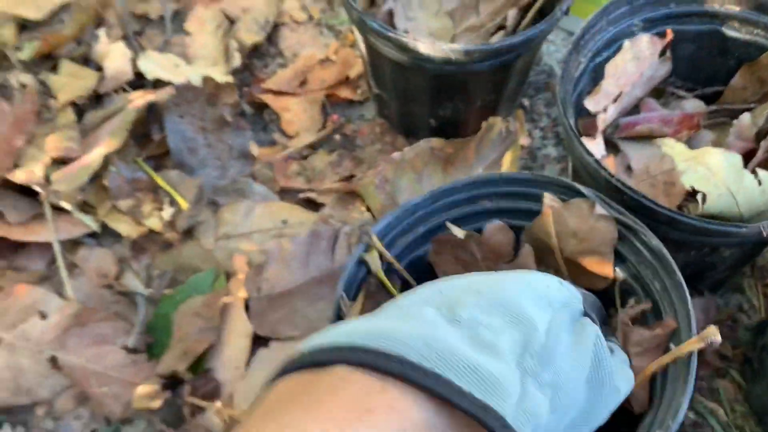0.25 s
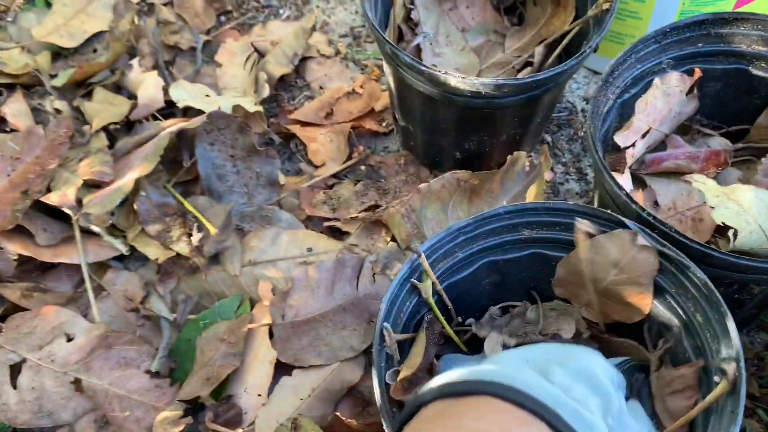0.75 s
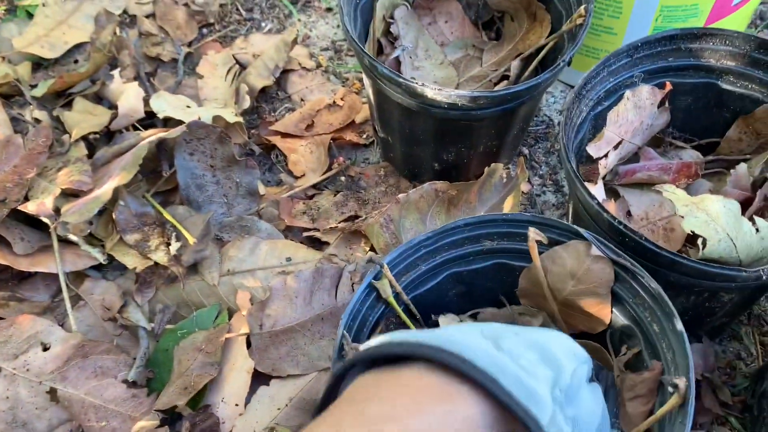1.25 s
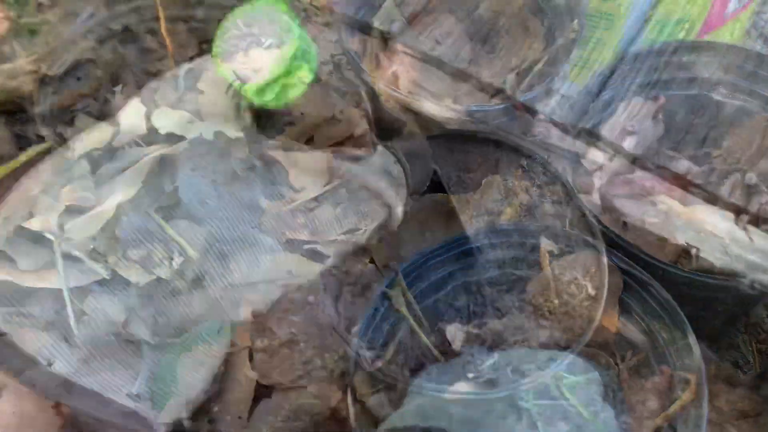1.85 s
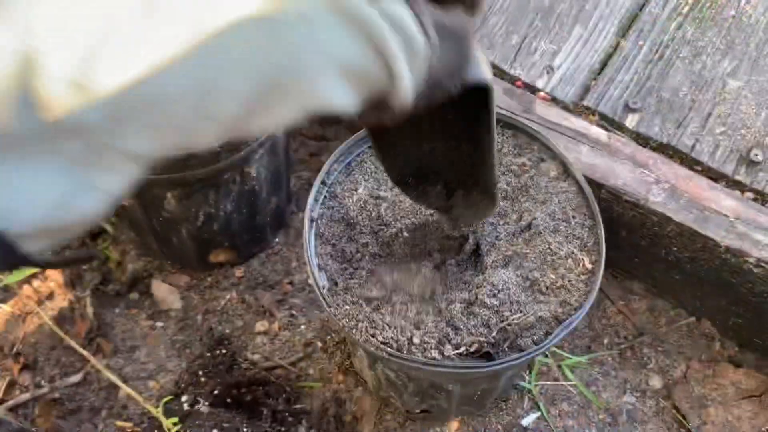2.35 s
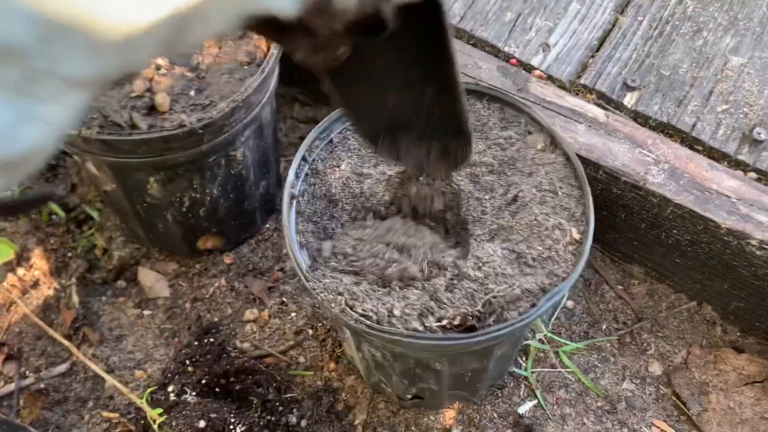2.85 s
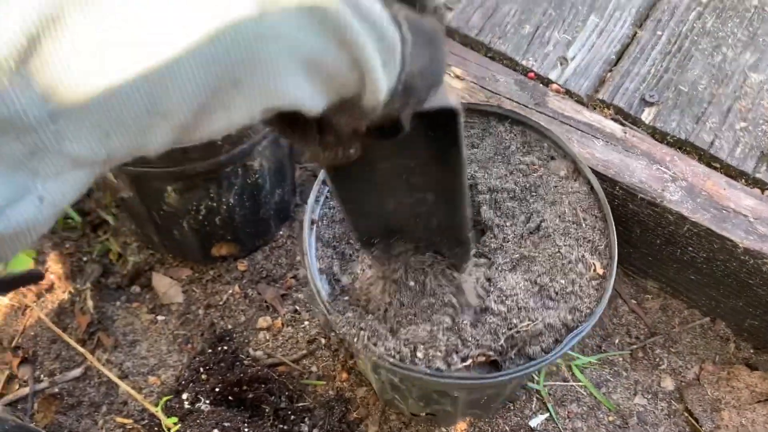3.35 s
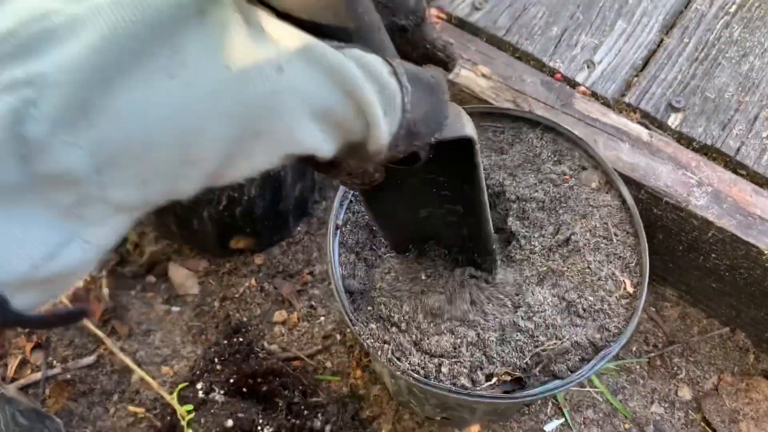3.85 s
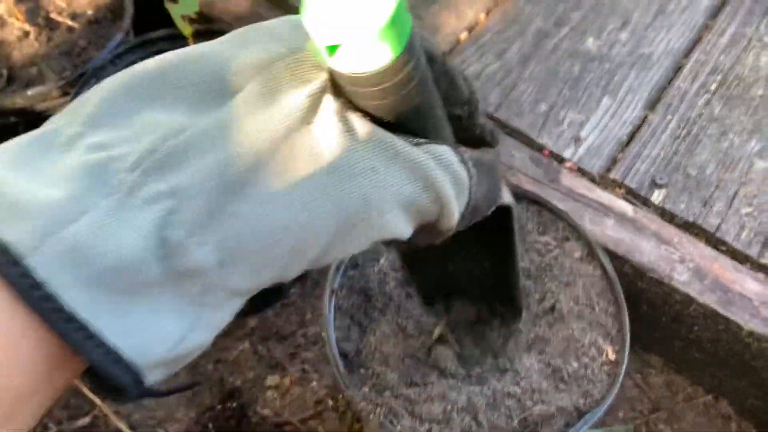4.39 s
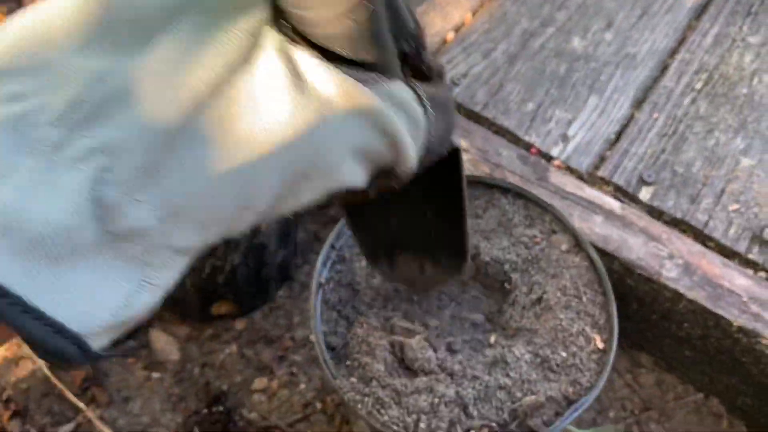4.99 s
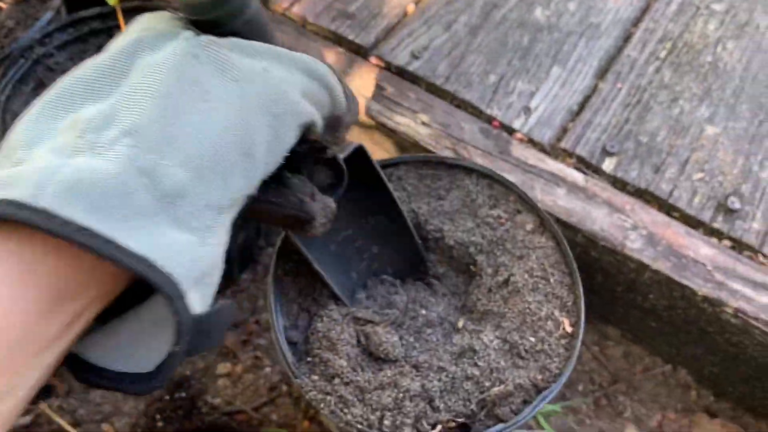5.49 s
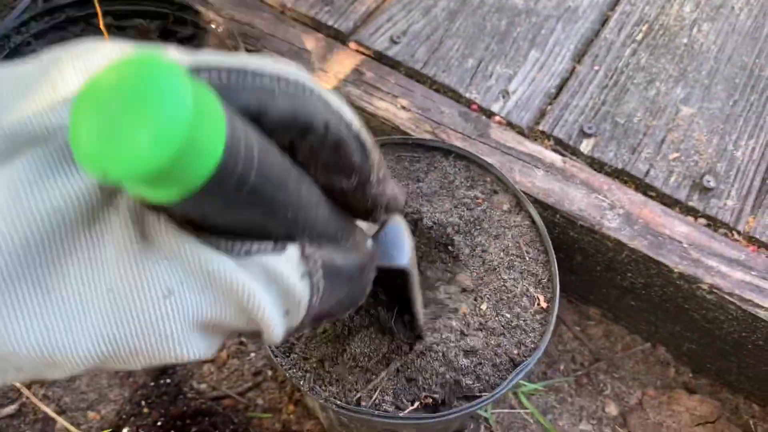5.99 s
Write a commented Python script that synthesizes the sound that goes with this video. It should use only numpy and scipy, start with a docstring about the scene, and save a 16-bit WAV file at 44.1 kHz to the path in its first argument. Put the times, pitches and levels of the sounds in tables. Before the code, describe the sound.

Dry leaves crush and crack near the microphone as a hand pushes them into a plastic plant pot. A low machine hum fades away with them, and a trowel starts digging in another pot, with quieter scrapes, a bright hiss of grit and small sharp clicks. Behind this outdoor gardening are a low rumble of far traffic, a few faint bird whistles and, late on, a run of raspy chirps.

```python
"""Gardening outdoors, close up, over a rumble of far traffic. For the first two seconds a gloved hand presses
dry leaves into a plastic pot: they crush, their ribs snap and the pot rings hollow. A far bird starts to
whistle, and a machine's hum fades out with the leaves. From about 2.3 s a trowel stabs and stirs gritty soil in
another pot: grit hisses and ticks along the blade, and the blade knocks against the pot and soil and rings.
From about 4.3 s a second bird repeats a raspy chirp behind the last strokes."""
import sys
import numpy as np
from scipy import signal
from scipy.fft import rfft, irfft, next_fast_len
from scipy.io import wavfile
from scipy.ndimage import uniform_filter1d, map_coordinates

SR = 44100
rng = np.random.default_rng(int(sys.argv[2]) if len(sys.argv) > 2 else 0)


def persist_wave(psi):
    """Save psi, clipped to +-1, as 16-bit WAV."""
    counts = np.round(np.clip(psi, -1, 1) * 32767).astype(np.int16)
    wavfile.write(sys.argv[1], SR, np.atleast_2d(counts).T)


N = 274743
TIME = np.arange(N) / SR


def amp(db):
    """Decibels to gain."""
    return 10 ** (np.asarray(db) / 20)


def unit(x):
    """Scale to rms 1."""
    return x / np.sqrt(np.mean(x ** 2) + 1e-20)


def along(points, hz):
    """Read (Hz, value) points on a log frequency axis."""
    point_hz, values = np.transpose(points)
    return np.interp(np.log(hz + 1), np.log(point_hz + 1), values)


def wobble(rate):
    """A smooth random curve with `rate` knots a second."""
    knots = rng.standard_normal(int(N * rate / SR) + 4)
    return map_coordinates(knots, [TIME * rate])


def swell(peak_s, rise, fall, power, ease_s=0.01):
    """A gesture builds to its peak and eases off; the hand cannot start or stop faster than ease_s."""
    ramp = np.interp(TIME, [peak_s - rise, peak_s, peak_s + fall], [0, 1, 0]) ** power
    return uniform_filter1d(ramp, int(ease_s * SR))


def filtered(x, response):
    """Pass x through a complex frequency response."""
    size = next_fast_len(N + SR // 2)
    return irfft(rfft(x, size) * response(np.fft.rfftfreq(size, 1 / SR)), size)[..., :N]


def colour(spectrum):
    """A minimum-phase EQ of unit power that follows (Hz, dB) points."""
    def response(hz):
        cepstrum = irfft(np.log(unit(amp(along(spectrum, hz)))))
        half = len(cepstrum) // 2
        cepstrum[1:half] *= 2
        cepstrum[half + 1:] = 0
        return np.exp(rfft(cepstrum))
    return response


def resonances(modes):
    """A resonator bank of unit power, built from (Hz, width Hz, dB) modes."""
    return lambda hz: unit(sum(amp(db) * 1j * hz * width / (centre ** 2 - hz ** 2 + 1j * hz * width)
                               for centre, width, db in modes))


def noise(spectrum):
    """Two unrelated streams of noise in one colour."""
    return unit(filtered(rng.standard_normal((2, N)), colour(spectrum)))


def grains(rate, spread_db, life_s, bed):
    """Tiny fractures, each with its own pitch and size, over a bed of finer friction; white overall."""
    t = np.arange(128) / SR
    when, pitch, chance, phase = rng.random((int(rate * N / SR), 4)).T
    size = amp(-spread_db * np.log(.02 + chance))  # many small, a few large
    tones = np.sin(np.pi * (SR * pitch[:, None] * t + 2 * phase[:, None]))
    pings = size[:, None] * np.exp(-t / life_s) * tones
    at = (when * N).astype(int)[:, None] + np.arange(len(t))
    fractures = np.bincount(at.ravel(), pings.ravel(), N)[:N]
    return unit(unit(fractures) + bed * rng.standard_normal(N))


def crackle(spectrum, rate, spread_db, life_s, bed):
    """Two unrelated streams of grains in one colour, each with `rate` grains a second."""
    pair = np.array([grains(rate, spread_db, life_s, bed) for _ in range(2)])
    return unit(filtered(pair, colour(spectrum)))


def cracks(table, rise_s, decay_s, tail_db, tail_s):
    """Sharp noise bursts with weak crumbling tails: one pair of signals for each dB column."""
    t = np.arange(SR // 30) / SR
    drives = np.zeros((len(table[0]) - 1, 2, N + len(t)))
    attack = (1 - np.exp(-t / rise_s)) ** 2
    envelope = attack * (np.exp(-t / decay_s) + amp(tail_db) * np.exp(-t / tail_s))
    for start_s, *band_db in table:
        burst = rng.standard_normal((2, len(t))) * envelope
        burst *= np.sqrt(SR / 1000) / np.linalg.norm(burst, axis=1, keepdims=True)  # as 1 ms at rms 1
        at = round(start_s * SR)
        drives[..., at:at + len(t)] += amp(band_db)[:, None, None] * burst
    return drives[..., :N]


# Stereo balance, leaning slightly right. Each row: frequency in Hz, left minus right in dB.
BALANCE = [(60, -2.5), (300, -2.1), (1200, 0.5), (2400, -1.5), (3400, -2), (5000, -3.5), (7000, 0),
           (15000, 0)]


def stereo(pair, likeness, phase=None):
    """Two unrelated signals reach two microphone ports partly alike; a phase table lets one side lead."""
    def blend(hz):
        angle = np.arccos(np.clip(along(likeness, hz), 0, 1)) / 2
        return np.array([np.cos(angle), np.sin(angle)])

    def pan(hz):
        lead = along(phase, hz) if phase else 0
        left = amp(along(BALANCE, hz) / 2) * np.exp(.5j * lead)
        return np.array([left, 1 / left])
    mid, side = filtered(pair, blend)
    return filtered(np.array([mid + side, mid - side]), pan)


# The yard's reverb, longest in the lows. Each row: frequency in Hz, seconds to fall by 60 dB.
YARD_DECAY = [(200, 1), (3000, 0.16), (12000, 0.058)]


def yard_echoes(x):
    """Scattered echoes from fences and trees, different on each side."""
    hz, t, bands = signal.stft(rng.standard_normal((2, SR // 2)), SR, nperseg=256)
    decay = amp(-60 * t / along(YARD_DECAY, hz)[:, None])
    tail = signal.istft(bands * decay, SR, nperseg=256)[1]
    return signal.fftconvolve(x, tail / np.linalg.norm(tail[0]), axes=1)[:, :N]


# The traffic's fader ride. Each row: time in seconds, level in dB.
TRAFFIC_RIDE = [(0, -44.5), (1.1, -46), (2.1, -49.5), (6.2, -48.5)]
# Its deep tone. Each row: frequency in Hz, relative level in dB.
TRAFFIC_EQ = [(13, -59.5), (22, -26.5), (27, -21), (34, -26), (46, -3), (81, 0.5), (135, -4.5), (161, -13),
              (231, -12.5), (280, -20), (331, -20.5), (402, -25.5), (600, -33.5), (780, -49.5),
              (1320, -120)]


def traffic():
    """Far traffic: a low, gently wavering rumble, loudest at the start."""
    level_db = np.interp(TIME, *np.transpose(TRAFFIC_RIDE))
    return amp(level_db + .6 * wobble(7)) * noise(TRAFFIC_EQ)


def machine_hum(pitch_hz=59.2):
    """A machine hums on one slightly unsteady low note, then fades out."""
    fade = np.interp(TIME, [1.6, 2.15], [1, 0])
    gain = amp(-47 + 1.5 * wobble(6.7)) * fade
    return gain * np.sqrt(2) * np.sin(2 * np.pi * pitch_hz * TIME + .2 * wobble(4.7))


# The soft wash of open air. Each row: frequency in Hz, relative level in dB.
AIR_EQ = [(150, -19.5), (400, 6.5), (600, 1.5), (1000, 5), (1500, -3.5), (2400, -8), (4000, -14),
          (6000, -16.5), (10000, -21), (15500, -37.5)]
# The ambience is narrow in the bass, wide above. Each row: frequency in Hz, left-right likeness (0-1).
AMBIENCE_LIKENESS = [(60, 1), (140, 0.81), (300, 0.53), (600, 0.056), (3000, 0.067)]


def ambience():
    """The outdoor bed: hum in the middle, traffic and faint air around it."""
    hum = machine_hum() * np.array([[1], [0]])  # feeds the mid only
    rumble = traffic()
    air = amp(-71 + 0.23 * wobble(1.2)) * noise(AIR_EQ)
    return stereo(rumble + air + hum, AMBIENCE_LIKENESS)


def slurs(notes, rasp):
    """Bird notes swell and trail off, gliding ever slower to their last pitch; flutter adds rasp."""
    song = np.zeros(N + SR)
    flutter = wobble(400)
    for start_s, length_s, from_hz, to_hz, db in notes:
        progress = np.linspace(0, 1, int(length_s * SR))
        at = round(start_s * SR) + np.arange(len(progress))
        glide = from_hz * (to_hz / from_hz) ** np.sin(np.pi / 2 * progress)
        pitch = glide * (1 + rasp * flutter[at % N])
        envelope = amp(db) * np.sqrt(2) * np.abs(np.sin(np.pi * progress)) ** .8
        song[at] += envelope * np.sin(2 * np.pi * np.cumsum(pitch) / SR)
    return song[:N]


def chirps(count, start_s, every_s, length_s, from_hz, to_hz, db):
    """A bird repeats one quick, raspy slur at an even pace."""
    notes = [(start_s + k * every_s, length_s, from_hz, to_hz, db) for k in range(count)]
    return slurs(notes, rasp=.09)


# The first bird's slurred whistles. Each row: start in seconds, length in seconds, first pitch in Hz,
# last pitch in Hz, level in dB ahead of the dry/wet mix.
BIRD_WHISTLES = [(1.3, .2, 3250, 3050, -70), (3.275, 0.24, 4020, 3030, -67.5),
                 (3.867, 0.2025, 3350, 3200, -77), (6.13, 0.11, 3900, 4300, -75)]


def birds():
    """Two far birds, blurred by echoes: wavering whistles and, further off, a run of falling chirps."""
    whistles = slurs(BIRD_WHISTLES, rasp=.026) * amp(2 * wobble(45))
    run = chirps(count=12, start_s=4.274, every_s=.1645, length_s=.07, from_hz=3800, to_hz=2360, db=-68.5)
    echoes = yard_echoes(np.array([whistles + run] * 2))
    return amp(-8.5) * whistles + amp(-10) * run + amp(1) * echoes


# The bright sizzle of fine grit. Each row: frequency in Hz, relative level in dB.
GRIT_EQ = [(3000, -30), (5500, -14.5), (7000, -2.5), (8500, 2), (10600, 2), (12200, -2.5), (14000, -5.5),
           (15700, -4)]
# The soil's stereo width. Each row: frequency in Hz, left-right likeness (0-1).
SOIL_LIKENESS = [(500, 0.55), (2000, 0.74), (5200, 0.61), (7200, 0.9), (10500, 0.68), (11700, 1),
                 (13000, 1)]
# The phone's fixed left-right phase, as heard on the trowel and grit.
# Each row: frequency in Hz, lead of the left side in radians.
SOIL_LEAD = [(400, 0), (1800, .7), (3400, 2.4), (5000, 2.3), (6000, 3), (7200, 3), (9300, 0),
             (11650, -3.14), (14000, -6.3), (16000, -9.4)]


def crumbs(start_s=1.5, level_db=-82):
    """Loose soil settles in faint, uneven trickles."""
    gain = amp(level_db + 2.2 * wobble(14)) * (TIME > start_s)
    trickle = gain * crackle(GRIT_EQ, rate=900, spread_db=7, life_s=.00016, bed=.8)
    return stereo(trickle, SOIL_LIKENESS, SOIL_LEAD)


def pot_walls(x, echo_db, t60_s):
    """Quick bounces between the pot's walls ripple the spectrum; long waves bend round them."""
    t = np.arange(SR // 25) / SR
    bounces = rng.standard_normal(len(t)) * amp(-60 * t / t60_s) * (t > .001)
    bounces = signal.lfilter(*signal.butter(2, 1500, "high", fs=SR), bounces)
    echoes = signal.fftconvolve(x, bounces[None] / np.linalg.norm(bounces), axes=1)[:, :N]
    return x + amp(echo_db) * echoes


# Snapping ribs and stalks. Each row: start in seconds, body level in dB, treble level in dB.
RIB_SNAPS = [(.097, -58, -44), (.157, -34, -43), (.222, -46, -37.5), (.35, -35, -46), (.442, -30.5, -31),
             (.482, -49, -36), (.503, -29, -32), (.52, -21.5, -23), (.55, -23, -24), (.612, -31, -30.5),
             (.693, -31, -25.5), (.708, -23.5, -26), (.721, -27, -31.5), (.761, -36, -32.5),
             (.77, -50, -46), (.794, -31, -34.5), (.817, -36, -42), (.957, -37, -39), (1.077, -41, -30),
             (1.116, -33, -45), (1.173, -60, -35), (1.219, -61, -36), (1.236, -42, -31.5),
             (1.242, -45.5, -41), (1.337, -63, -63), (1.358, -49, -55), (1.441, -61, -53),
             (1.519, -55.5, -60), (1.595, -46.5, -46), (1.655, -47, -33), (2.053, -53, -44.5)]
# A rib's woody body and a leaf's crisp edges. Each row: frequency in Hz, relative level in dB.
RIB_EQ = [(200, -22.5), (500, -3), (1000, -6.5), (2500, -4.5), (3600, 3.5), (4600, 3), (5600, -16),
          (9000, -34.5)]
CRISP_EQ = [(3000, -30.5), (5800, -9), (7200, 0.5), (9000, -1.5), (11300, -4.5), (12500, -7.5),
            (15600, -12)]


def rib_snaps():
    """Dry ribs and stalks break, each with a woody crack and a crisp top."""
    body, treble = cracks(RIB_SNAPS, rise_s=0.00092, decay_s=.0008, tail_db=-32, tail_s=0.013)
    return filtered(body, colour(RIB_EQ)) + filtered(treble, colour(CRISP_EQ))


# Presses of the glove. Each row: moment of greatest force, rise and fall, all in seconds,
# then crush level in dB, crisp-edge level in dB.
GLOVE_PRESSES = [(.03, 0.4, 0.1, -55, -59.5), (.21, 0.18, .21, -48.5, -55), (0.449, .15, 0.2, -40.5, -45.5),
                 (.625, 0.024, 0.056, -41, -41.5), (.71, 0.21, 0.093, -36, -40.5),
                 (.98, 0.2, 0.24, -49, -55), (1.12, 0.13, 0.09, -42.5, -47.5),
                 (1.21, 0.08, 0.059, -45, -50.5), (1.29, .08, 0.31, -62.5, -76),
                 (1.54, 0.14, 0.16, -57, -62.5), (1.69, 0.13, 0.1, -54.5, -49),
                 (1.91, 0.19, 0.21, -63, -61.5), (2.05, 0.036, 0.21, -69.5, -70)]
# Fingers bumping the inside of the pot. Each row: start in seconds, level in dB.
FINGER_BUMPS = [(.157, -37), (.222, -33), (.35, -33.5), (.794, -34), (1.18, -42), (1.267, -46),
                (1.446, -46.5), (1.519, -44)]
# The midrange crunch of crushed leaves. Each row: frequency in Hz, relative level in dB.
CRUSH_EQ = [(150, -36.5), (330, 0), (430, -2), (520, -1), (700, 4.5), (930, 4), (1220, -1), (1500, 0.5),
            (2300, 2), (2800, -4), (3300, -4.5), (4600, -8.5), (5600, -11), (7000, -10.5), (9000, -27)]
# The plastic pot's hollow ring. Each row: frequency in Hz, bandwidth in Hz, relative level in dB.
POT_MODES = [(416, 29, 4), (852, 110, -9), (980, 43, -1.5), (1358, 110, -9.5), (1480, 120, -9.5),
             (3110, 150, 0), (4100, 53, -10.5), (4530, 720, 1.5)]
# The leaves' stereo width. Each row: frequency in Hz, left-right likeness (0-1).
LEAF_LIKENESS = [(500, 0.73), (1000, 0.95), (2100, 0.94), (2800, 0.29), (4500, 0.2), (5400, 0.13),
                 (7200, 0.98), (10500, 0.61), (11700, 1), (13000, 0.96)]
# The phone's fixed left-right phase, as heard on the leaves.
# Each row: frequency in Hz, lead of the left side in radians.
LEAF_LEAD = [(100, 0), (2400, 0), (3100, 1.3), (3600, .6), (4700, .3), (5600, 4), (7200, 3.1), (9300, 0),
             (11650, -3.14), (14000, -6.3), (16000, -9.4)]


def leaves():
    """Leaves buckle in clumps and splinter under each press; the crush and finger bumps ring the pot."""
    force = np.array([swell(s, rise, fall, power=0.91) for s, rise, fall, *_ in GLOVE_PRESSES])
    press_power = amp(np.array(GLOVE_PRESSES)[:, 3:].T) ** 2
    crush_gain, crisp_gain = np.sqrt(press_power @ force ** 2)
    clumps = wobble(70)
    crush = crackle(CRUSH_EQ, rate=2500, spread_db=5, life_s=0.0013, bed=1)
    crush *= crush_gain * amp(1.2 * clumps)
    crisp = crackle(CRISP_EQ, rate=1200, spread_db=3, life_s=0.00044, bed=0.77)
    crisp *= crisp_gain * amp(1.9 * clumps)
    snaps = rib_snaps()
    splinters = amp(-10) * crush_gain * crackle(RIB_EQ, rate=210, spread_db=1.5, life_s=0.00077, bed=0)
    splinters += amp(-7) * crisp_gain * crackle(CRISP_EQ, rate=140, spread_db=6.5, life_s=0.00047, bed=0)
    bumps, = cracks(FINGER_BUMPS, rise_s=0.0002, decay_s=0.00064, tail_db=-28, tail_s=.004)
    body = crush + filtered(bumps, colour(CRUSH_EQ))
    hollow = amp(-19.5) * filtered(body, resonances(POT_MODES))
    in_pot = pot_walls(body + hollow + crisp, echo_db=-7.5, t60_s=0.042)
    return stereo(in_pot + snaps + splinters, LEAF_LIKENESS, LEAF_LEAD)


# Grit hitting the blade. Each row: start in seconds, click level in dB, treble level in dB.
GRIT_TICKS = [(2.272, -57, -51), (2.305, -43, -38.5), (2.356, -43, -28.5), (2.515, -65, -49),
              (2.612, -55, -48), (2.633, -48, -39), (2.812, -62, -41), (2.916, -50, -29), (3.154, -60, -50),
              (3.415, -78, -64), (3.525, -76, -64), (3.559, -64, -33.5), (3.6, -45, -45), (3.775, -36, -25),
              (3.801, -34, -23), (3.85, -43, -39), (4.155, -36, -34), (4.908, -74, -50), (4.983, -51, -34),
              (5.028, -34, -28), (5.056, -32, -28), (5.356, -42.5, -43), (5.712, -62, -50.5),
              (5.741, -53.5, -46), (5.777, -58, -45), (5.81, -65, -49)]
# The hard tone of one click. Each row: frequency in Hz, relative level in dB.
CLICK_EQ = [(400, -20.5), (1000, -4), (2300, -4.5), (3500, -2), (5200, 2), (7000, 3), (9500, -19)]
# The ticks' stereo width. Each row: frequency in Hz, left-right likeness (0-1).
TICK_LIKENESS = [(500, .8), (2500, .7), (4000, .15), (6500, .15), (8500, .75), (13000, 1)]


def grit_ticks():
    """Larger bits of grit strike the blade with short, bright ticks."""
    click, treble = cracks(GRIT_TICKS, rise_s=.0007, decay_s=.0006, tail_db=-27, tail_s=.005)
    ticks = filtered(click, colour(CLICK_EQ)) + filtered(treble, colour(GRIT_EQ))
    return stereo(ticks, TICK_LIKENESS, SOIL_LEAD)


# The blade knocking against the pot or soil. Each row: start in seconds, drive level in dB ahead of the low-
# pass.
BLADE_KNOCKS = [(2.814, -58.5), (2.829, -53), (3.569, -43.5), (3.591, -47), (3.831, -54), (3.839, -44.5),
                (4.022, -64.5), (4.039, -59), (4.908, -58.5), (4.936, -59), (5.028, -40), (5.356, -65)]


def blade_knocks(cutoff_hz=5000):
    """The blows of the blade against the pot or soil that set it ringing; they are dull."""
    knocks, = cracks(BLADE_KNOCKS, rise_s=0.0009, decay_s=0.00077, tail_db=-16.5, tail_s=0.0046)
    return filtered(knocks, lambda hz: 1 / (1 + 1j * hz / cutoff_hz) ** 2)


# Trowel moves, from hard stabs to soil sliding off. Each row: moment of greatest speed, rise and fall,
# all in seconds, then scrape level in dB, sliding-grit level in dB.
TROWEL_STROKES = [(2.372, 0.086, 0.098, -48.5, -44), (2.535, 0.061, 0.082, -62, -63),
                  (2.63, 0.03, 0.043, -62, -54), (2.88, .08, .06, -60.5, -47),
                  (2.918, 0.032, 0.031, -43.5, -38), (3.08, 0.27, 0.18, -66, -64),
                  (3.2, 0.18, 0.12, -64, -61.5), (3.59, 0.041, 0.043, -46, -44),
                  (3.721, 0.093, 0.21, -57.5, -49.5), (3.82, 0.12, 0.14, -59, -68),
                  (4.161, 0.091, 0.044, -52, -46.5), (4.244, .025, 0.022, -53.5, -54),
                  (4.315, 0.13, 0.095, -59.5, -58.5), (4.44, 0.16, 0.14, -66, -77),
                  (4.66, 0.065, 0.095, -68, -77), (5.027, 0.08, 0.15, -44, -41),
                  (5.255, 0.14, 0.077, -59, -56.5), (5.38, 0.12, .11, -66.5, -72),
                  (5.485, 0.06, 0.15, -61.5, -64), (5.73, 0.27, 0.26, -66.5, -72.5),
                  (5.935, 0.066, 0.064, -57, -59), (6.06, 0.072, 0.14, -65.5, -80)]
# The edge skids on the crust and sings before it sinks in. Each row: moment of the peak, rise and fall,
# all in seconds, then drive level in dB.
EDGE_SKIDS = [(2.885, .075, 0.043, -70.5), (4.14, 0.24, 0.094, -79.5)]
# The broad rasp of the blade. Each row: frequency in Hz, relative level in dB.
SCRAPE_EQ = [(200, -31), (450, -5.5), (750, 1.5), (1250, -3), (1750, -3), (2200, -2.5), (2750, -0.5),
             (3350, 0.5), (4300, -4.5), (5600, -6), (7000, 0), (9000, -16.5)]
# The blade's ring in soil. Each row: frequency in Hz, bandwidth in Hz, relative level in dB.
BLADE_MODES = [(1720, 270, -2.5), (2040, 370, 2.5), (2320, 75, -2.5), (3290, 99, -14), (4100, 300, -3.5)]


def trowel(curve=1.12, ring_db=-15.5, bury_s=0.17):
    """Soil scrapes and grit hisses along the blade, which rings as it bites until the soil damps it."""
    speed = np.array([swell(s, rise, fall, curve) for s, rise, fall, *_ in TROWEL_STROKES])
    unburied = np.array([np.exp(-np.maximum(TIME - s + rise, 0) / bury_s)
                         for s, rise, *_ in TROWEL_STROKES])
    stroke_power = amp(np.array(TROWEL_STROKES)[:, 3:].T) ** 2
    scrape_gain, grit_gain = np.sqrt(stroke_power @ speed ** 2)
    ring_gain = amp(ring_db) * np.sqrt(stroke_power[0] @ (speed * unburied) ** 2)
    ring_gain += sum(amp(db) * swell(s, rise, fall, curve) for s, rise, fall, db in EDGE_SKIDS)
    slips = wobble(85)
    scrape = amp(.8 * slips) * crackle(SCRAPE_EQ, rate=1400, spread_db=3, life_s=0.00088, bed=1)
    hiss = amp(0.71 * slips) * crackle(GRIT_EQ, rate=3000, spread_db=4.5, life_s=.00016, bed=.7)
    ticks = grit_ticks()
    ring = filtered(blade_knocks() + ring_gain * scrape, resonances(BLADE_MODES))
    in_pot = pot_walls(scrape_gain * scrape + grit_gain * hiss, echo_db=-9, t60_s=.045)
    return stereo(in_pot + ring, SOIL_LIKENESS, SOIL_LEAD) + ticks


def scene():
    """The close work with a trace of echo, in front of the birds and the outdoor bed."""
    work = leaves() + trowel() + crumbs()
    return work + amp(-17.5) * yard_echoes(work) + birds() + ambience()


def record(dry):
    """A phone's band limit: a brick-wall cut of the highest treble."""
    top_hz = 15900
    return filtered(dry, lambda hz: 1 / np.sqrt(1 + (hz / top_hz) ** 160))


dry = scene()
out = record(dry)
persist_wave(out)
```